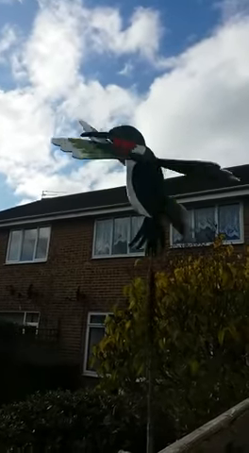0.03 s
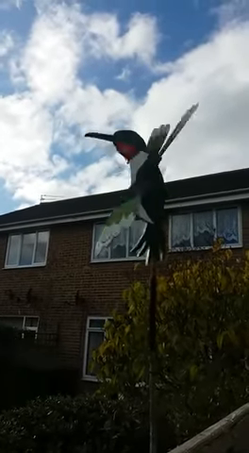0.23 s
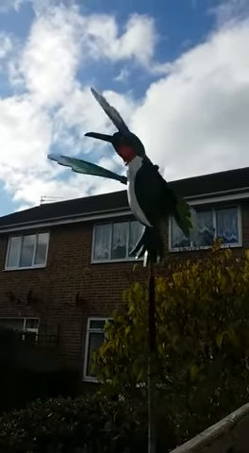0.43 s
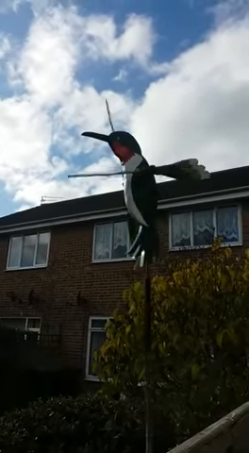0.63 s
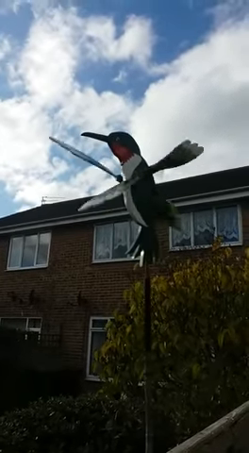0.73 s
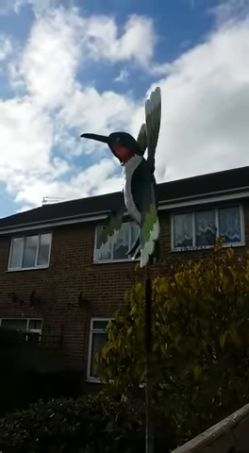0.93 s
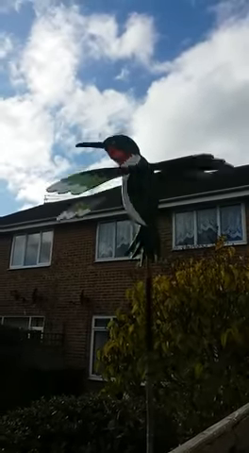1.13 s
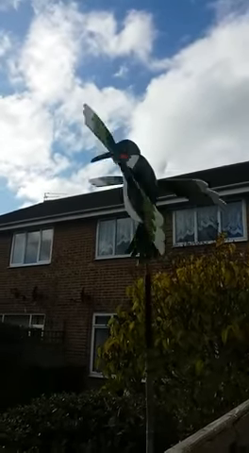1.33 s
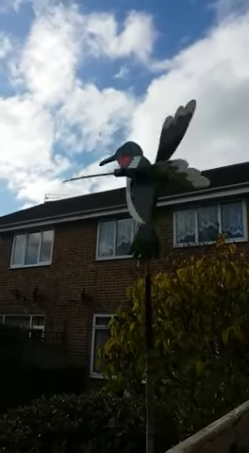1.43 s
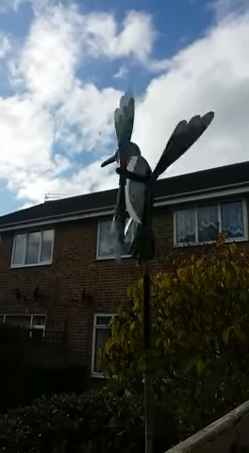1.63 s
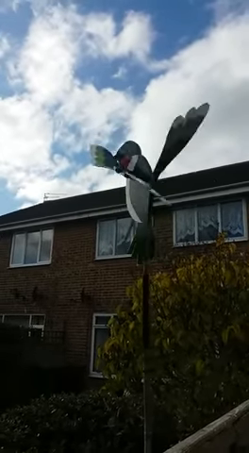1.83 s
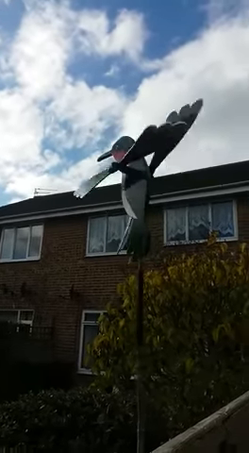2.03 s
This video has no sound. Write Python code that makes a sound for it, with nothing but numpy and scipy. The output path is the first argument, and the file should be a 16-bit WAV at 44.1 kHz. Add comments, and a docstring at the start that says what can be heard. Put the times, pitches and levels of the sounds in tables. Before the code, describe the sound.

Gusty wind rumbles and thumps on the microphone, over very faint garden ornament ticks.

```python
"""Garden gusts and a whirligig

A small microphone stands out in a garden, buffeted by gusts: a low rumble that breaks into a
brighter flutter, with single eddies thumping on the port. Nearby a whirligig bird turns, its wings
clacking and ticking faintly on their axle. Behind it, leaves rustle and distant trees rush steadily."""
import sys
import numpy as np
from scipy import signal
from scipy.fft import rfft, irfft, next_fast_len
from scipy.io import wavfile
from scipy.ndimage import uniform_filter1d, minimum_filter1d, map_coordinates

SR = 44100
rng = np.random.default_rng(int(sys.argv[2]) if len(sys.argv) > 2 else 0)


def to_wav(sig):
    """Store sig (one row per channel, or 1-D mono) as 16-bit WAV at the path in sys.argv[1].

    Samples outside -1..1 are clipped; the rate is SR.
    """
    pcm = np.clip(np.atleast_2d(sig), -1, 1) * 32767
    pcm = np.round(pcm).astype(np.int16)
    wavfile.write(sys.argv[1], SR, pcm.T)  # frames by channels


N = 92610

# gusts on the microphone: t/s, rumble level/dB, flutter level/dB, rise/s, fall/s
GUSTS = [(0.228, -21.5, -31.5, 0.0038, 0.027), (.43, -25, -35, 0.013, 0.023),
         (0.485, -18, -27, 0.027, 0.011), (0.531, -24, -30.5, 0.018, 0.016),
         (0.578, -20, -36.5, 0.019, 0.014), (.947, -20.5, -41.5, 0.033, 0.026),
         (1.033, -20, -29.5, .014, 0.01), (1.063, -19.5, -32, 0.005, 0.017),
         (1.222, -18.5, -29.5, 0.023, 0.017), (1.366, -15, -44.5, 0.0055, 0.01),
         (1.401, -19, -33, 0.0088, 0.0069), (1.427, -15.5, -54, 0.0045, 0.0069),
         (1.496, -18, -29.5, 0.047, 0.033), (1.58, -32.5, -41, 0.019, .015), (1.692, -16, -21, 0.032, .022),
         (1.717, -22, -18.5, 0.015, 0.018), (1.774, -15, -25, 0.034, 0.027), (1.824, -20, -37, 0.019, .02)]
# breeze on the port between gusts: t/s, level/dB
BREEZE_LEVEL = [(0, -52.5), (.08, -47), (.2, -40.5), (.29, -32), (.33, -37.5), (.38, -25.5), (.46, -31.5),
                (.58, -29), (.63, -33.5), (.69, -30.5), (.77, -29.5), (.8, -44.5), (.86, -27.5),
                (.99, -28.5), (1.11, -25.5), (1.17, -29), (1.28, -27.5), (1.34, -41.5), (1.38, -25),
                (1.53, -32), (1.58, -25.5), (1.62, -36.5), (1.7, -13.5), (1.83, -28.5), (1.92, -32),
                (1.97, -49.5), (2.04, -40.5), (2.1, -38.5)]
# spectrum of the wind's low rumble: f/Hz, level/dB
RUMBLE_SPECTRUM = [(22, -66.5), (31, -45), (40, -22.5), (58, -0.5), (100, 2), (190, -5), (280, -15.5),
                   (400, -29), (600, -47), (1000, -95.5)]
# spectrum of its brighter flutter: f/Hz, level/dB
FLUTTER_SPECTRUM = [(100, -21.5), (220, 3), (340, 3), (550, -11), (750, -22), (1100, -27.5), (1700, -35.5),
                    (3000, -71.5)]
# eddies hitting the port: t/s, peak level/dB, centre f/Hz
EDDIES = [(.229, -19.5, 424), (0.2334, -10.5, 204), (0.2912, -16.5, 139), (.474, -8, 199),
          (0.4843, -8.5, 344), (.509, -11, 118), (.529, -9, 298), (0.545, -12, 172), (.597, -10, 153),
          (.9575, -15.5, 177), (1.034, -12, 280), (1.064, -22.5, 357), (1.212, -16.5, 277),
          (1.429, -19.5, 378), (1.495, -13.5, 390), (1.514, -14, 222), (1.673, -8.5, 127.7),
          (1.688, -12, 495), (1.698, -16.5, 700), (1.705, -9, 286), (1.717, -9.5, 462), (1.769, -9, 174.4),
          (1.7776, -10, 273), (1.791, -17.5, 433), (1.795, -9.5, 133)]
# dull clacks of the wings: t/s, peak level/dB, pitch ratio
WING_CLACKS = [(.045, -55, 1.1), (.06, -51, 0.9), (0.326, -55, 0.81), (0.431, -56, 0.8),
               (0.524, -59.5, 0.82), (1.12, -56.5, 1), (1.126, -49.5, 0.92), (1.153, -50.5, 0.87),
               (1.345, -50, .9), (1.364, -46, 0.92), (1.37, -45, 1), (1.477, -54, 1.1),
               (1.492, -52.5, 0.92), (1.635, -51.5, 0.97), (1.763, -42, 1.03), (1.813, -54, 1.1),
               (1.928, -48, 1)]
# modes of a wing at pitch ratio 1: f/Hz, level/dB, t60/s
WING_MODES = [(2772, -2.5, 0.047), (3110, 5, 0.017), (3636, -1, .024), (5000, -10, 0.039)]
# bright ticks of the axle: t/s, peak level/dB
AXLE_TICKS = [(.328, -54), (.43, -53), (0.578, -57), (1.082, -61.5), (1.839, -53.5), (1.9105, -41.5),
              (1.926, -52), (1.939, -52)]
# modes of the axle at pitch ratio 1: f/Hz, level/dB, t60/s
AXLE_MODES = [(2780, -4, 0.027), (4700, -6.5, 0.018), (5700, -2, 0.027), (10200, -7.5, .02)]
# rush of the distant trees: t/s, level/dB
TREES_LEVEL = [(0, -46.5), (.17, -46), (.4, -46.5), (1.2, -48), (1.7, -48), (2.1, -48.5)]
# spectrum of that rush: f/Hz, level/dB
TREES_SPECTRUM = [(30, -35.5), (60, -6), (100, 9), (180, -4.5), (300, -8), (600, -6), (1050, 0), (1500, -1),
                  (2000, -4), (2450, -10), (2900, -28), (3600, -42), (6000, -74.5)]
# rustle of the nearer leaves: t/s, level/dB
LEAVES_LEVEL = [(0, -62), (.08, -62), (.2, -65.5), (1.0, -66.5), (1.35, -57.5), (1.85, -55.5), (2.1, -55)]
# spectrum of that rustle: f/Hz, level/dB
LEAVES_SPECTRUM = [(900, -34.5), (1600, -2), (2100, 2), (2500, -2.5), (2900, -22), (3700, -28), (4800, -32),
                   (6500, -41)]
# spectrum of a thin background hiss: f/Hz, level/dB
HISS_SPECTRUM = [(500, 2.5), (3000, 2.5), (5000, 5), (6300, -3), (8000, 0), (10500, 2), (15500, -1)]

RUMBLE_DB, FLUTTER_DB, HISS_DB = 1, 2.5, -67
EDDY_WIDTH_RAD = 1.836  # half-length of an eddy's pressure swing
SOFT_HZ, SOFT_AT_DB, DB_PER_OCTAVE = 6000, -54.5, 9.5  # a light contact's treble limit; harder opens it
LOW_CUT_HZ, TOP_HZ = 47.5, 15830
CEILING_DB, LIMITER_HOLD_S = -3.5, 0.015


def wind():
    """Right on the microphone, gusts swell over the breeze; only they are fast enough to flutter."""
    t = np.arange(N) / SR
    rumble_power, flutter_power = envelope(BREEZE_LEVEL) ** 2, np.zeros(N)
    for at, rumble_db, flutter_db, rise, fall in GUSTS:
        swell = np.exp(-np.abs((t - at) / np.where(t < at, rise, fall)) ** 2.31)
        rumble_power += (amp(rumble_db) * swell) ** 2
        flutter_power += (amp(flutter_db) * swell) ** 2
    rumble = amp(RUMBLE_DB + 2.3 * wobble(70)) * turbulence(RUMBLE_SPECTRUM, window=900)
    flutter = amp(FLUTTER_DB + 1.6 * wobble(110)) * turbulence(FLUTTER_SPECTRUM, window=600)
    return np.sqrt(rumble_power) * rumble + np.sqrt(flutter_power) * flutter


def turbulence(spectrum, window):
    """Churning air: noise with its power evened out over a window of samples, for the gusts to shape."""
    churn = noise(spectrum)
    power = uniform_filter1d(np.abs(signal.hilbert(churn)) ** 2, window)
    power = np.abs(uniform_filter1d(power, window))
    return unit(churn / np.sqrt(power + 1e-6))


def eddies():
    """Each eddy is a short swing of pressure at the port; smaller ones pass faster and sound higher."""
    t, thumps = np.arange(N) / SR, np.zeros(N)
    for at, db, hz in EDDIES:
        phase = 2 * np.pi * hz * (t - at)
        swing = np.sin(phase) * np.exp(-(phase / EDDY_WIDTH_RAD) ** 2 / 2)
        thumps += amp(db) * swing / swing.max()
    return thumps


def whirligig():
    """Near the microphone, the wings clack and the axle ticks as the ornament turns."""
    clacks = sum(strike(at, db, WING_MODES, pitch, scrape_db=-4.5, scrape_t60=0.045,
                        scrape_hz=[2200, 5000]) for at, db, pitch in WING_CLACKS)
    ticks = sum(strike(at, db, AXLE_MODES, pitch=0.97, scrape_db=-2.5, scrape_t60=0.022,
                       scrape_hz=[2500, 11000]) for at, db in AXLE_TICKS)
    return clacks + ticks


def strike(at, db, modes, pitch, scrape_db, scrape_t60, scrape_hz):
    """A light contact: a few short modes and a dying scrape, duller the softer it is."""
    t = np.arange(SR // 10) / SR
    ring = sum(amp(level + rng.normal(0, 1.7) - 60 * t / t60) * np.sin(2 * np.pi * hz * pitch * t)
               for hz, level, t60 in modes)
    band = signal.butter(2, scrape_hz, "band", fs=SR, output="sos")
    scrape = signal.sosfilt(band, rng.standard_normal(len(t))) * amp(scrape_db - 60 * t / scrape_t60)
    edge_hz = SOFT_HZ * 2 ** ((db - SOFT_AT_DB) / DB_PER_OCTAVE)
    soften = signal.butter(2, min(edge_hz, TOP_HZ), fs=SR, output="sos")
    attack = 1 - np.exp(-t / 0.0016)
    hit = signal.sosfilt(soften, (ring + scrape) * attack)
    return np.pad(amp(db) * hit / np.abs(hit).max(), (round(at * SR), N))[:N]


def garden():
    """The bed of the place: trees rushing far off, leaves rustling nearer, a thin steady hiss."""
    trees = envelope(TREES_LEVEL) * noise(TREES_SPECTRUM)
    leaves = envelope(LEAVES_LEVEL) * noise(LEAVES_SPECTRUM)
    return trees + leaves + amp(HISS_DB) * noise(HISS_SPECTRUM)


def amp(db):
    """Decibels to gain."""
    return 10 ** (np.asarray(db) / 20)


def envelope(points):
    """A gain curve through points of t/s, level/dB."""
    return amp(np.interp(np.arange(N) / SR, *np.transpose(points)))


def unit(x):
    """Scale to rms 1."""
    return x / np.sqrt(np.mean(x ** 2) + 1e-20)


def filtered(x, response):
    """Shape x by a gain given as a function of f/Hz."""
    size = next_fast_len(N + SR // 2)
    return irfft(rfft(x, size) * response(np.fft.rfftfreq(size, 1 / SR)), size)[:N]


def noise(spectrum):
    """Noise of rms 1, its spectrum drawn through points of f/Hz, level/dB."""
    f, db = np.transpose(spectrum)
    white = rng.standard_normal(N)
    return unit(filtered(white, lambda hz: amp(np.interp(np.log(hz + 1), np.log(f), db))))


def wobble(rate):
    """A smooth random curve, rate knots a second."""
    knots = rng.standard_normal(int(N * rate / SR) + 4)
    return map_coordinates(knots, [np.arange(N) * rate / SR])


def scene():
    """One microphone in the garden: wind on the port, the whirligig nearby, trees in the distance."""
    return (wind() + eddies() + whirligig() + garden())[None]


def record(dry):
    """The microphone drops the deepest bass, a limiter holds the peaks, and the top treble is cut."""
    low_cut = signal.butter(4, LOW_CUT_HZ, "high", fs=SR, output="sos")
    mic = signal.sosfilt(low_cut, dry[0])
    hold = int(LIMITER_HOLD_S * SR)
    needed_gain = np.minimum(1, amp(CEILING_DB) / (np.abs(mic) + 1e-9))
    held_gain = minimum_filter1d(needed_gain, hold)
    smooth_gain = uniform_filter1d(uniform_filter1d(held_gain, hold // 2), hold // 2)
    return filtered(mic * smooth_gain, lambda hz: hz < TOP_HZ)[None]


dry = scene()
out = record(dry)
to_wav(out)
```